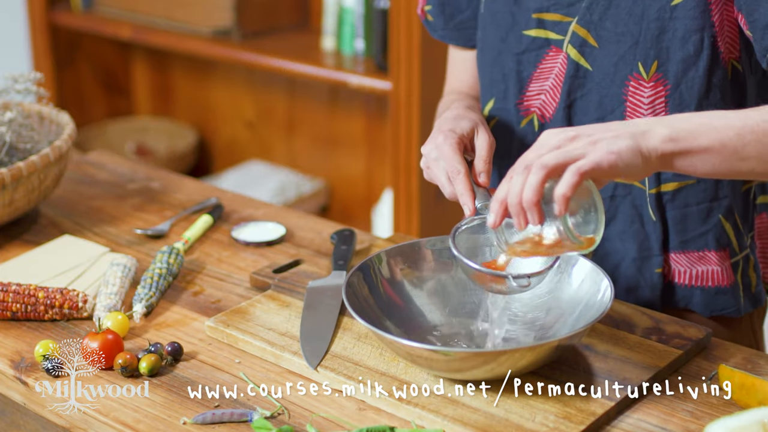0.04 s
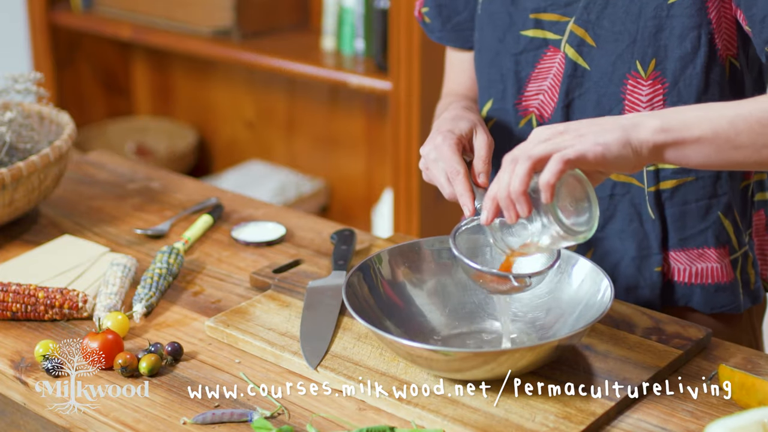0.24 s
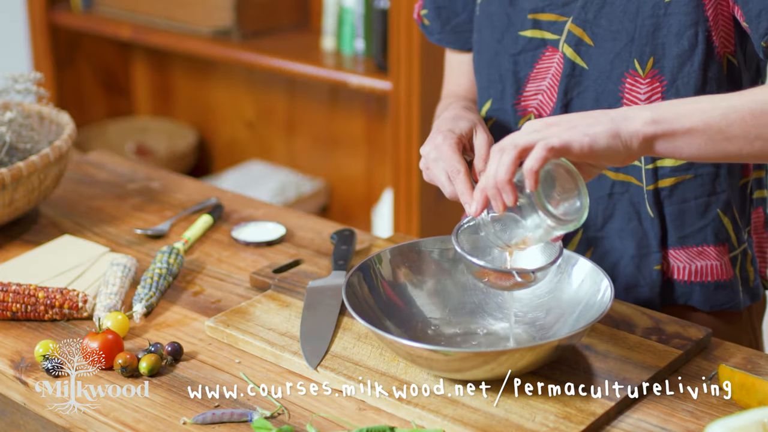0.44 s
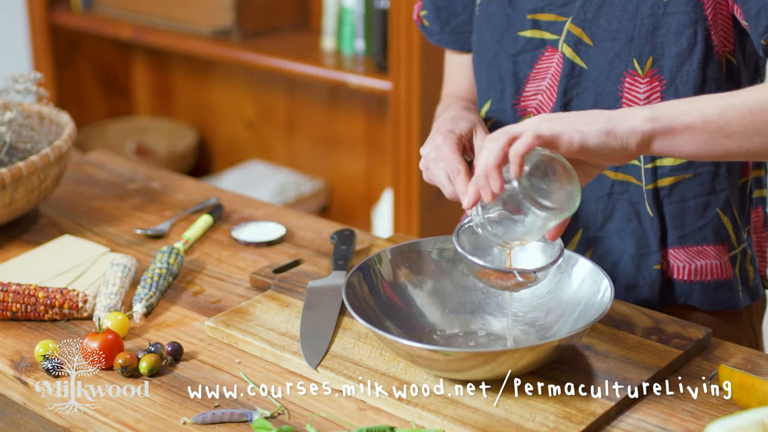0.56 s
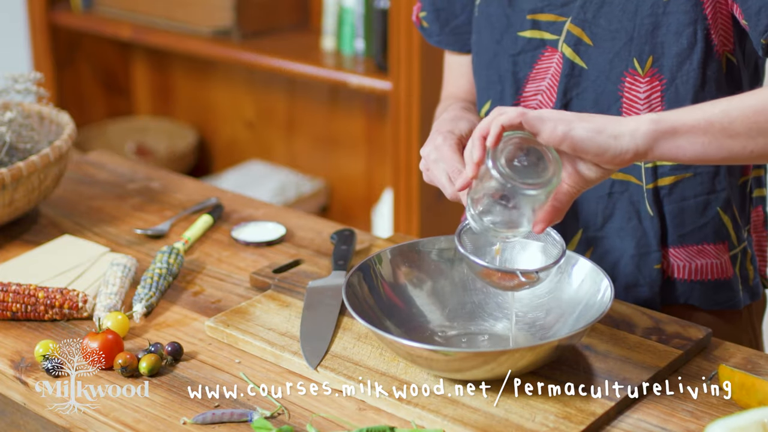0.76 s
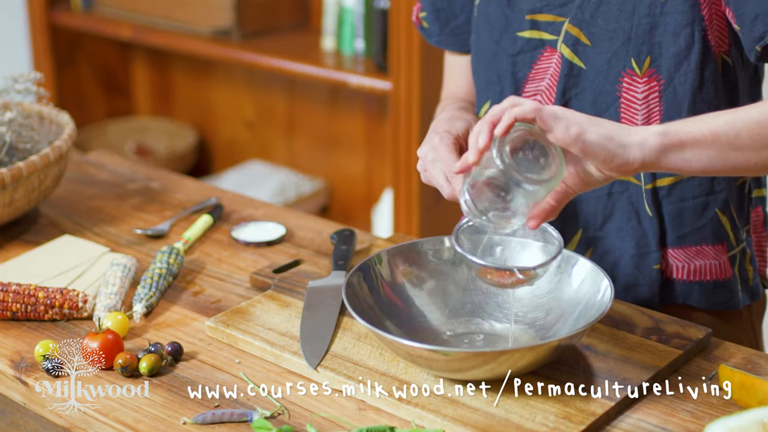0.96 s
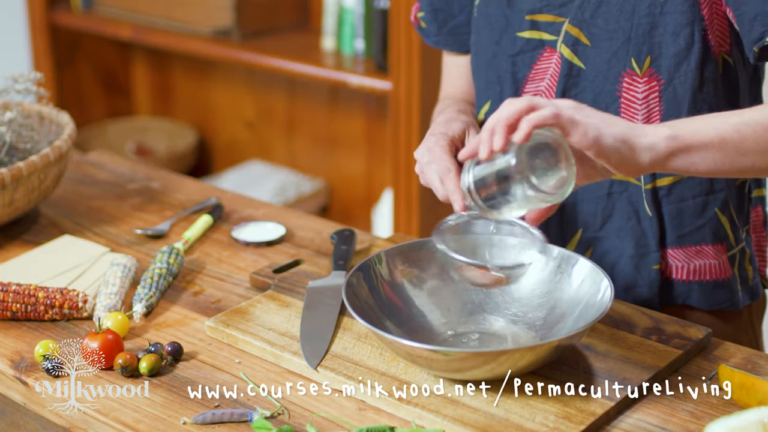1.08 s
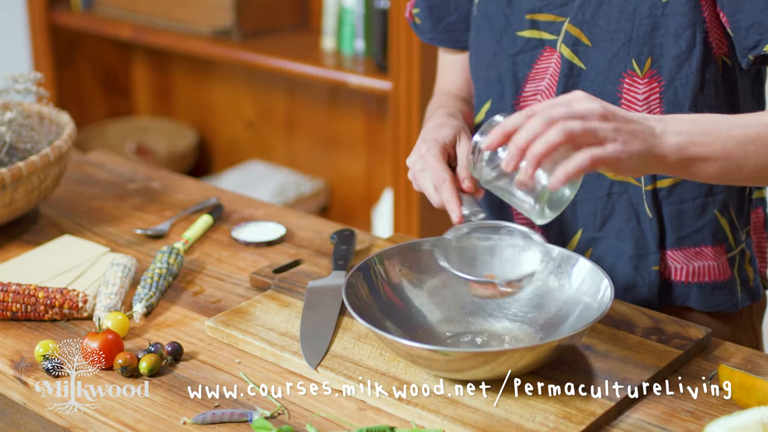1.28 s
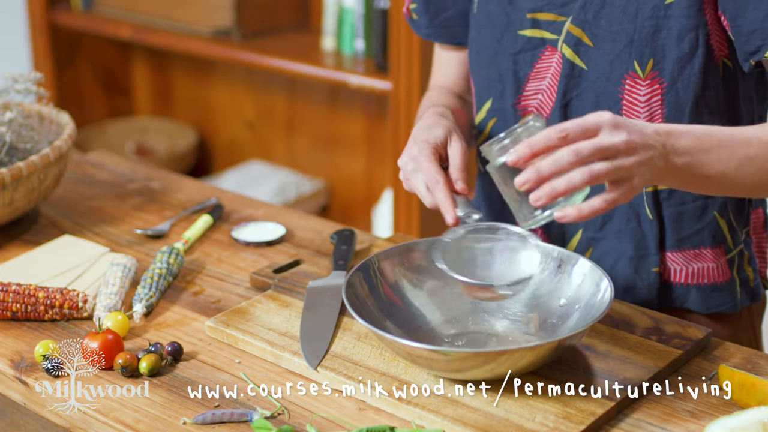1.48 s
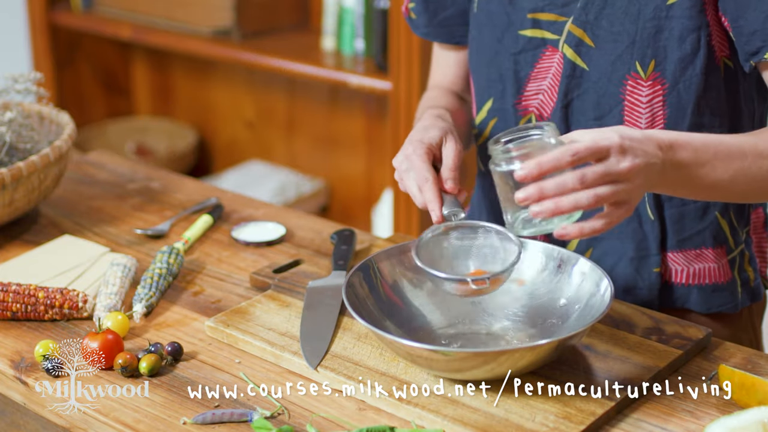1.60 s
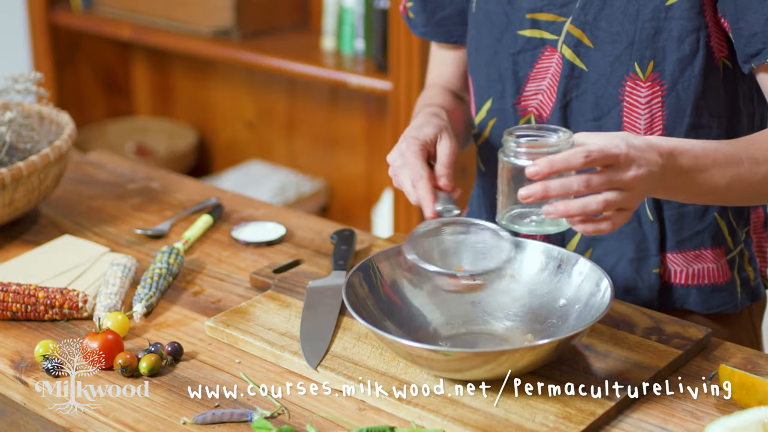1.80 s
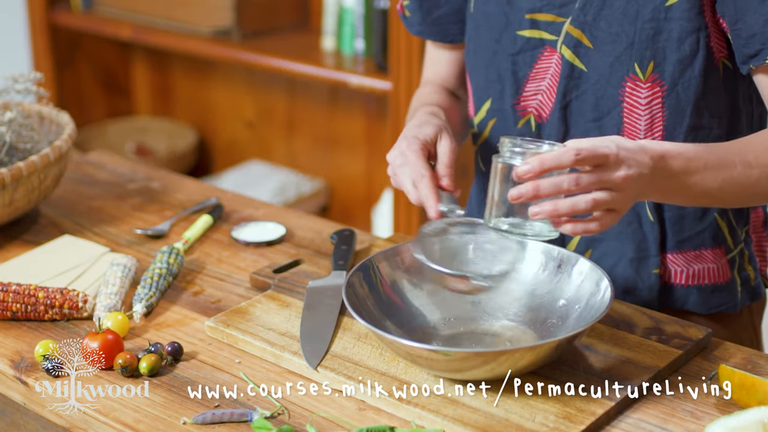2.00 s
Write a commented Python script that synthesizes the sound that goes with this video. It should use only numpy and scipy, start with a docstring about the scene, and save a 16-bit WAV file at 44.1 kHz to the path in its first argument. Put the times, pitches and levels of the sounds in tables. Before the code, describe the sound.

Water poured from a glass jar through a sieve splashes and trickles into a metal bowl, then stops

```python
"""Water runs from a jar through a sieve into a steel bowl: trapped bubbles ping, tiny ones fizz, and noise
bursts crack where drops land hard; the bowl and a small kitchen echo them as a decaying noise tail.
Early on, air in the emptying jar hums as a narrow sinking tone. The flow slows to single drips and stops;
near the end something knocks once, a short low ping with a snap of noise. Behind it all, filtered noise
makes the room's rumble, hiss and hum, whose level sinks for a while after the first second and returns."""
import sys
import numpy as np
from scipy import signal
from scipy.fft import rfft, irfft
from scipy.io import wavfile

SR = 44100
rng = np.random.default_rng(int(sys.argv[2]) if len(sys.argv) > 2 else 0)


def transcribe(signal):
    """Save signal, clipped to [-1, 1], as a 16-bit WAV file at the path in sys.argv[1]."""
    frames = np.atleast_2d(signal).T
    limited = np.clip(frames, -1, 1)
    pcm = np.round(limited * 32767).astype(np.int16)
    wavfile.write(sys.argv[1], SR, pcm)


def field_ratio(decibels):
    """Amplitude ratio for a level in dB (20 dB per decade); scalars and array-likes work."""
    return 10 ** (np.asarray(decibels, dtype=float) / 20)


N = 90052  # length of the scene in samples

# Bubbles trapped by drops: (time [s], peak level [dB], starting pitch [Hz], ring down to -60 dB [cycles])
BUBBLES = [(0.0054, -35, 5500, 39), (0.0209, -38, 11400, 52), (0.0363, -32, 9470, 51),
           (0.0366, -27.5, 7400, 25), (0.0368, -31, 4900, 20.5), (0.0372, -31.5, 5970, 31.5),
           (0.0438, -24.5, 6400, 31), (0.0548, -33.5, 2930, 47.5), (0.0555, -29, 6650, 33.5),
           (0.0907, -29, 8880, 63), (0.0909, -19, 5180, 10.5), (0.0912, -23, 7000, 31),
           (0.0915, -30.5, 4070, 15), (0.0917, -37, 1913, 43), (0.0922, -30, 1390, 29.5),
           (0.0945, -35.5, 2660, 34.5), (0.0974, -18, 6460, 38.5), (0.1015, -20, 6840, 37.5),
           (0.1134, -26.5, 6180, 34), (0.1231, -39.5, 2480, 23), (0.1235, -38.5, 3840, 23),
           (0.133, -32.5, 5500, 36), (0.1421, -36, 2480, 22), (0.1625, -43.5, 1850, 24),
           (0.1764, -43, 10060, 56), (0.1835, -52, 10500, 65), (0.2089, -41, 12100, 58),
           (0.2105, -44, 2000, 3), (0.2199, -39.5, 1945, 26), (0.2289, -32.5, 4500, 30),
           (0.2294, -27.5, 6670, 36), (0.2563, -52, 12900, 62), (0.2733, -43, 10400, 63),
           (0.3127, -37, 3980, 39), (0.3192, -39.5, 9500, 73), (0.3262, -37.5, 2020, 9),
           (0.3324, -39.5, 12200, 55), (0.3775, -31, 4270, 23), (0.3974, -43.5, 4430, 40),
           (0.4125, -29.5, 10000, 41.5), (0.413, -36.5, 4200, 20.5), (0.4135, -37, 6100, 38.5),
           (0.4978, -43, 11850, 64.5), (0.4993, -49.5, 6240, 42), (0.5382, -44.5, 9750, 72),
           (0.5415, -36, 3430, 22), (0.5432, -26.5, 4500, 27), (0.5648, -31, 3420, 24),
           (0.5651, -31.5, 2840, 45), (0.5702, -22, 4680, 5), (0.5711, -26, 5370, 26),
           (0.5757, -26, 4570, 26), (0.5791, -27.5, 2424, 13), (0.5795, -31, 3380, 54),
           (0.58, -36.5, 1680, 15), (0.6379, -41, 4170, 35.5), (0.6392, -28, 5470, 35),
           (0.7392, -40, 4500, 26.5), (0.7471, -22, 4680, 11.5), (0.7482, -39.5, 3170, 28),
           (0.7485, -36.5, 1730, 3), (0.7493, -26.5, 5640, 23.5), (1.0859, -60, 4080, 33),
           (1.088, -62.5, 1850, 24.5), (1.2096, -64, 10640, 62), (1.2161, -58.5, 4500, 21.5),
           (1.3483, -59.5, 4730, 13.5), (1.485, -52.5, 4270, 20), (1.6218, -28, 4110, 23.5),
           (1.6235, -46, 6140, 30)]
# Cracks of drops landing hard, and last the snap of the knock:
# (time [s], level [dB], centre of the spectrum [Hz])
CRACKS = [(0.0361, -26.5, 5500), (0.0899, -19, 4500), (0.1232, -37, 3500), (0.1843, -32.5, 9000),
          (0.209, -33, 6000), (0.2288, -34, 7000), (0.3255, -36, 2480), (0.3752, -43, 5000),
          (0.4128, -29.5, 7900), (0.4986, -44, 9000), (0.54, -39, 3500), (0.5638, -39, 3500),
          (0.5700, -34, 6000), (0.5768, -33, 2500), (0.6372, -42, 7000), (0.7486, -34, 5000),
          (1.061, -46.5, 12500), (1.1933, -55, 11000), (1.348, -57, 5000), (1.486, -50.5, 7000),
          (1.6213, -45, 7000), (1.836, -46, 1950)]
# Fizz of tiny bubbles while the water flows: (time [s], level of the quietest [dB])
FIZZ_LEVEL = [(0, -65), (.035, -58), (.045, -54.5), (.085, -50), (.11, -51), (.16, -56), (.2, -54),
              (.26, -61), (.3, -71.5), (.45, -63), (.53, -75), (.6, -58), (.7, -71), (.8, -66), (1.0, -86)]
# How long the echo rings at each pitch: (frequency [Hz], time to fall 60 dB [s])
ECHO_T60 = [(500, 0.25), (1500, 0.19), (3000, 0.18), (7000, 0.14), (14000, 0.23)]
# Tone colour of the echo tail: (frequency [Hz], relative level [dB])
ECHO_COLOUR = [(500, 7.5), (1500, -0.5), (3000, -5.5), (7000, 1), (14000, 0)]
# Distinct returns from the bowl's far wall: (delay [s], level against the direct sound [dB])
BOWL_WALL = [(0.00098, 0), (0.0047, -14)]
# Air humming in the emptying jar: (time [s], pitch [Hz], level [dB])
JAR_AIR = [(0.02, 777, -73), (0.05, 761, -56.5), (0.121, 713, -58.5), (0.22, 676, -57), (0.27, 640, -76)]
# A dull knock: (time [s], peak level [dB], starting pitch [Hz], ring down to -60 dB [cycles])
KNOCK = [(1.8384, -37.5, 537, 3.3)]
# Spectrum of the room's rumble and hiss: (frequency [Hz], relative level per Hz [dB])
AIR_COLOUR = [(15, -55.5), (30, -26.5), (38, -16), (47, 1), (80, -1.5), (108, -3), (277, -18.5),
              (326, -16.5), (373, -21), (463, -22), (840, -26), (3720, -29), (14800, -35.5), (16000, -37.5)]
# Loudness of the rumble and hiss: (time [s], rms level [dB])
AIR_LEVEL = [(0, -48.5), (.1, -45.5), (.3, -49), (.5, -52.5), (.6, -47), (.8, -52.5), (.95, -52.5),
             (1.02, -54), (1.1, -60), (1.2, -62), (1.3, -68.5), (1.39, -66), (1.435, -73), (1.47, -58),
             (1.52, -53), (1.64, -48.5), (1.8, -50.5), (2.04, -58)]

# Pings: swell in cycles, and climb of the phase by the end of the ring, as a fraction
RISE_CYCLES, GLIDE = 1.5, 0.021
# Cracks: time to fall to 1/e, and width of the spectrum
CRACK_S, CRACK_OCTAVES = 0.0016, 1.5
# Fizz: mean rate, middle pitch, spread of pitch, ring, and spread of loudness
FIZZ_PER_S, FIZZ_HZ, FIZZ_OCTAVES, FIZZ_CYCLES, FIZZ_SCATTER_DB = 1400, 4500, 0.75, 11, 3
# Echo: kitchen level, silence before the tail, and lumpiness (0 = smooth)
KITCHEN_DB, ECHO_GAP_S, ECHO_LUMPINESS = -0.5, 0.0012, 0.44
BOWL_DB, BOWL_T60_S = -4, 0.034
JAR_WIDTH_HZ = 51
# Room: rms depth and top rate of the flicker; the hum's level is against the rumble and hiss
AIR_FLICKER_DB, AIR_FLICKER_HZ = 1, 30
HUM_HZ, HUM_WIDTH_HZ, HUM_DB = 113.5, 34, -8
MIC_TOP_HZ = 15600


def curve(table, x, log=False):
    """Straight lines between the rows, over a logarithmic x axis if asked."""
    xs, ys = np.array(table, float).T
    if log:
        return np.interp(np.log(x), np.log(xs), ys)
    return np.interp(x, xs, ys)


def unit(x):
    """Scale to rms 1."""
    return x / np.sqrt(np.mean(x ** 2))


def coloured(gain, size):
    """White noise filtered so that gain(Hz) shapes its spectrum."""
    hz = np.maximum(np.fft.rfftfreq(size, 1 / SR), 1)
    return irfft(rfft(rng.standard_normal(size)) * gain(hz), size)


def add(out, s, sound):
    """Lay a sound into the track at s seconds."""
    i = max(int(s * SR), 0)
    out[i:i + len(sound)] += sound[:len(out) - i]


def ping(db, hz, cycles):
    """A bubble rings as a sine that swells in a cycle or two, climbs a little and dies away."""
    turns = np.arange(int(cycles / hz * SR) + 2) * hz / SR
    swell = (1 - np.exp(-turns / RISE_CYCLES)) ** 2
    decay = np.exp(-np.log(1000) * turns / cycles)
    shape = swell * decay
    phase = 2 * np.pi * turns * (1 + GLIDE * turns / cycles)
    return field_ratio(db) * shape / shape.max() * np.sin(phase)


def ring_out(table):
    """Lay out a table of pings, each started early to leave room for its swell."""
    out = np.zeros(N)
    for s, db, hz, cycles in table:
        add(out, s - RISE_CYCLES / hz, ping(db, hz, cycles))
    return out


def drops_and_snap():
    """Bubbles ping at their own pitch; hard landings and the knock's snap crack as decaying noise bursts."""
    out = ring_out(BUBBLES)
    t = np.arange(400) / SR
    for s, db, hz in CRACKS:
        burst = coloured(lambda f: np.exp(-(np.log2(f / hz) / CRACK_OCTAVES) ** 2), size=len(t))
        add(out, s, field_ratio(db) * unit(burst) / 2 * np.exp(-t / CRACK_S))
    return out


def fizz():
    """Many tiny bubbles ping at chance moments, pitches and sizes, their level following the flow."""
    out = np.zeros(N)
    chance = rng.random((1500, 3))
    pitch = rng.standard_normal(len(chance))
    gaps = -np.log(chance[:, 0]) / FIZZ_PER_S
    times = np.cumsum(gaps)
    for s, size, p in zip(times, chance[:, 1], pitch):
        if s < FIZZ_LEVEL[-1][0]:
            hz = np.clip(FIZZ_HZ * 2 ** (FIZZ_OCTAVES * p), 1700, 15000)
            db = curve(FIZZ_LEVEL, s) - FIZZ_SCATTER_DB * np.log(size)
            add(out, s, ping(db, hz, FIZZ_CYCLES))
    return out


def decaying(t, db, t60):
    """A fall of 60 dB in t60 seconds, scaled so that a long and a short tail carry like energy."""
    return field_ratio(db - 60 * t / t60) / np.sqrt(t60 * SR / 14)


def echo(x):
    """The bowl's short tail and the kitchen's longer one: lumpy noise, each band dying at its own rate."""
    t = np.arange(SR // 2) / SR
    tail = 0
    for hz in 250 * 2 ** np.arange(0, 6.1, .5):  # half-octave steps
        band = coloured(lambda f: np.exp(-(np.log2(f / hz) * 2) ** 2), size=len(t))
        kitchen = decaying(t, KITCHEN_DB, curve(ECHO_T60, hz, log=True))
        bowl = decaying(t, BOWL_DB, BOWL_T60_S)
        tail = tail + field_ratio(curve(ECHO_COLOUR, hz, log=True)) * band * (kitchen + bowl)
    lumps = np.abs(unit(coloured(lambda f: f < 900, size=len(t)))) ** ECHO_LUMPINESS
    tail = tail * unit(lumps) * (t > ECHO_GAP_S)
    for s, db in BOWL_WALL:
        tail[int(s * SR)] += field_ratio(db)
    return signal.fftconvolve(x, tail)[:N]


def jar():
    """Air resonating in the jar: a narrow breathy tone that sinks as the jar empties."""
    s, hz, db = np.array(JAR_AIR).T
    t = np.arange(N) / SR
    waver = unit(coloured(lambda f: 1 / (1 + (f / JAR_WIDTH_HZ * 2) ** 2), size=N))
    phase = 2 * np.pi * np.cumsum(np.interp(t, s, hz)) / SR
    level = field_ratio(np.interp(t, s, db)) * (t < s[-1])
    return waver * np.sin(phase) * level


def knock():
    """The dry, dull thump of the knock: a low ping that dies within a few cycles."""
    return ring_out(KNOCK)


def air():
    """Room rumble and hiss: octave bands of noise that flicker a little, with a wavering low hum."""
    noise = 0
    for hz in 31 * 2 ** np.arange(10):

        def band_gain(f):
            window = np.cos(np.clip(np.log2(f / hz), -1, 1) * np.pi / 2)
            return field_ratio(curve(AIR_COLOUR, f, log=True)) * window

        band = coloured(band_gain, size=N)
        flicker = unit(coloured(lambda f: f < AIR_FLICKER_HZ, size=N))
        noise = noise + band * field_ratio(AIR_FLICKER_DB * flicker)
    hum = coloured(lambda f: 1 / (1 + ((f - HUM_HZ) / HUM_WIDTH_HZ * 2) ** 2), size=N)
    level = field_ratio(curve(AIR_LEVEL, np.arange(N) / SR))
    return (unit(noise) + field_ratio(HUM_DB) * unit(hum)) * level


def scene():
    """Mix the water and the snap, their echo, the jar, the knock and the room to one channel."""
    wet = drops_and_snap() + fizz()  # all that the bowl and kitchen echo
    mix = wet + echo(wet) + jar() + knock() + air()
    return mix[None]


def band_limit(x):
    """A steep low-pass at the top of the band."""
    return signal.sosfilt(signal.butter(12, 16480, fs=SR, output="sos"), x)


def record(dry):
    """One microphone whose treble ends in a steep elliptic low-pass."""
    steep_top = signal.ellip(8, .2, 60, MIC_TOP_HZ, fs=SR, output="sos")  # 0.2 dB ripple, 60 dB stop
    mic = signal.sosfilt(steep_top, dry)
    return band_limit(mic)


dry = scene()
out = record(dry)
transcribe(out)
```